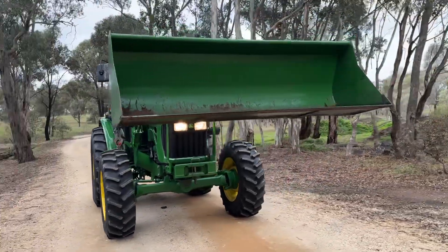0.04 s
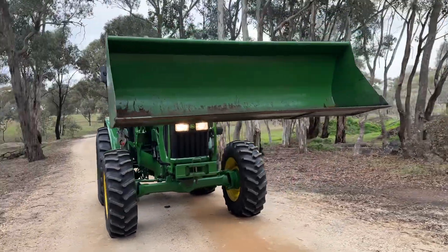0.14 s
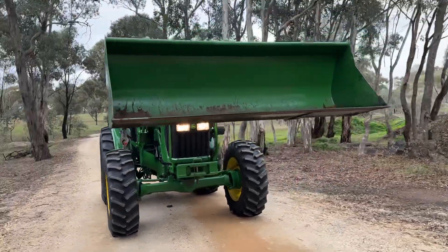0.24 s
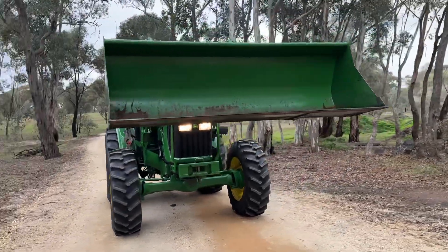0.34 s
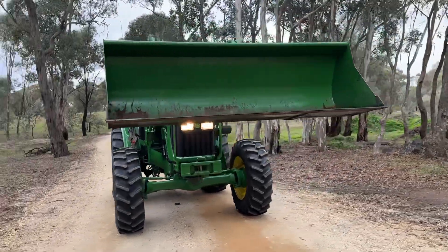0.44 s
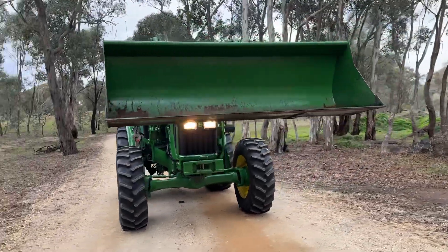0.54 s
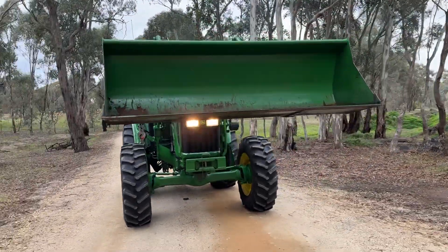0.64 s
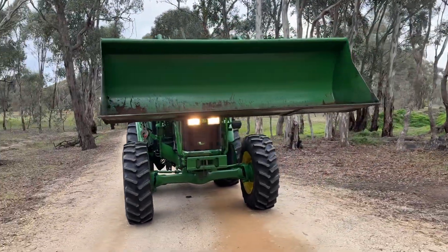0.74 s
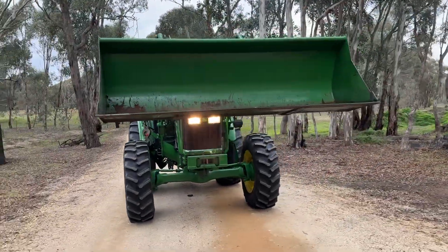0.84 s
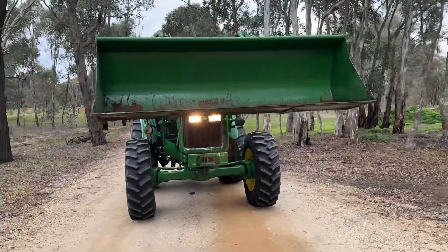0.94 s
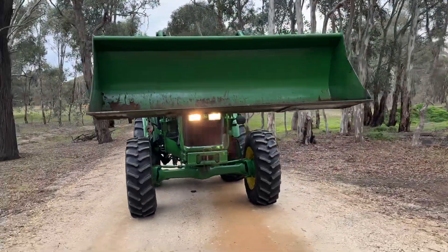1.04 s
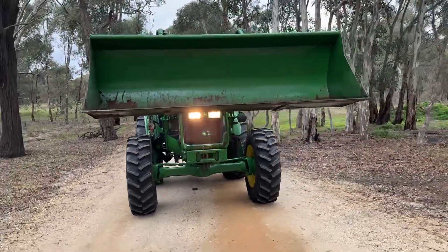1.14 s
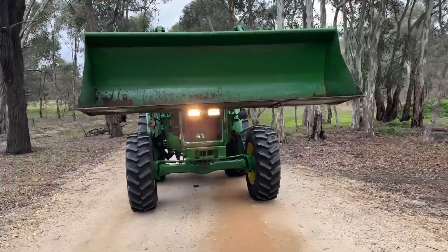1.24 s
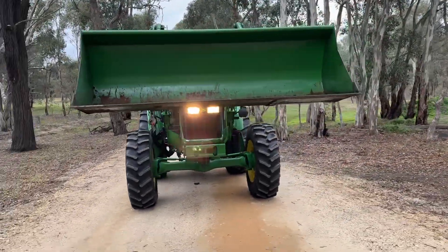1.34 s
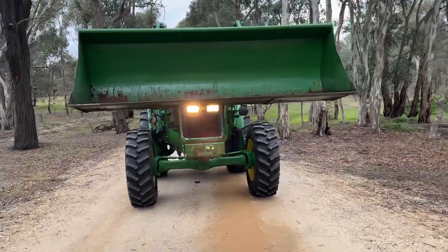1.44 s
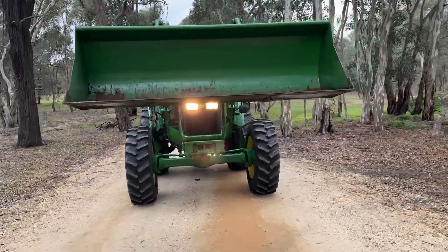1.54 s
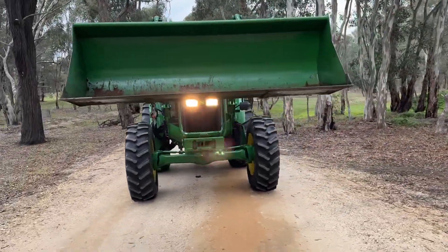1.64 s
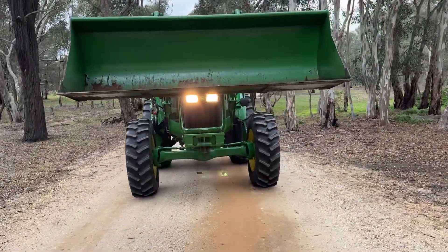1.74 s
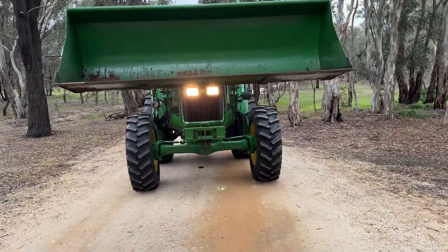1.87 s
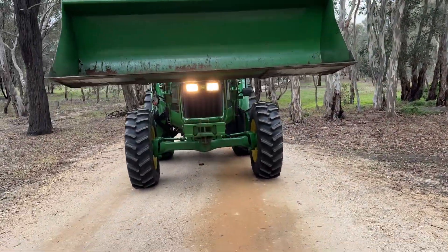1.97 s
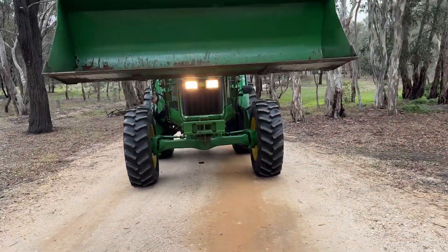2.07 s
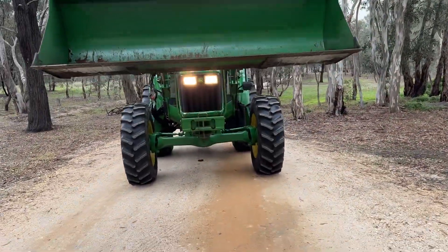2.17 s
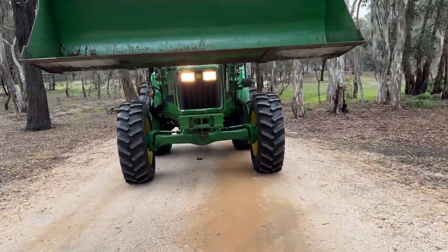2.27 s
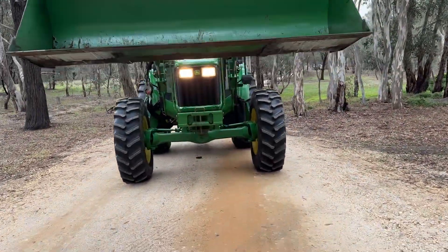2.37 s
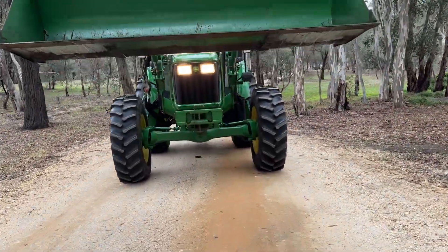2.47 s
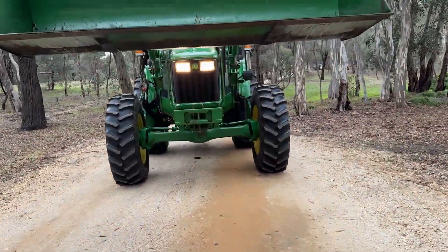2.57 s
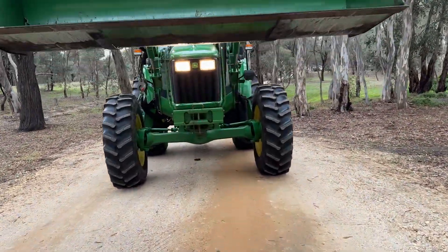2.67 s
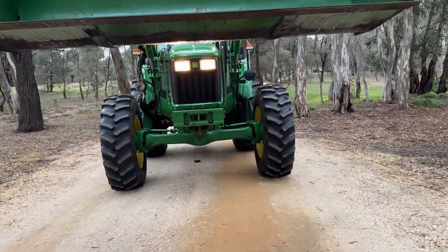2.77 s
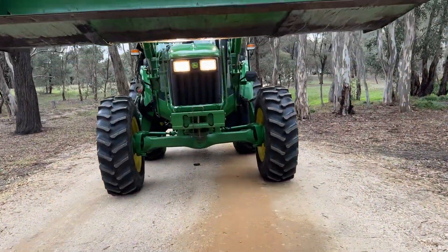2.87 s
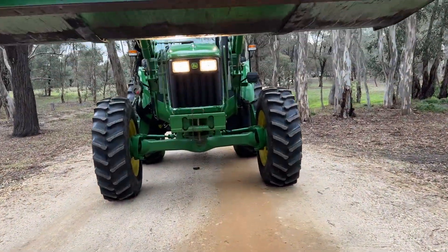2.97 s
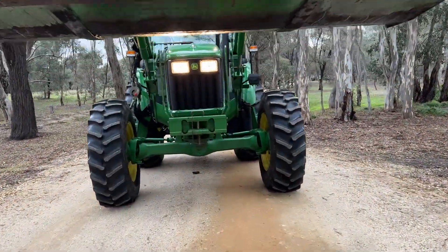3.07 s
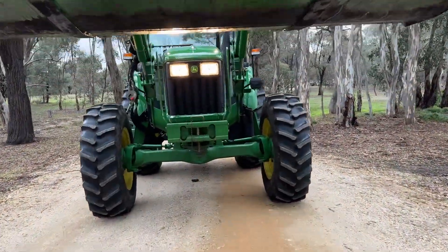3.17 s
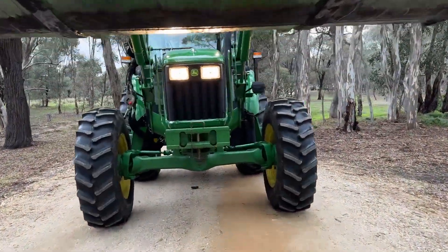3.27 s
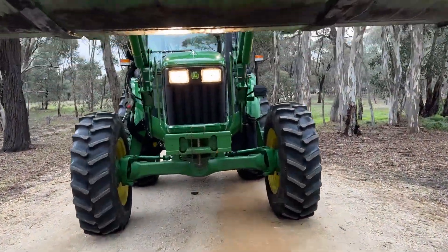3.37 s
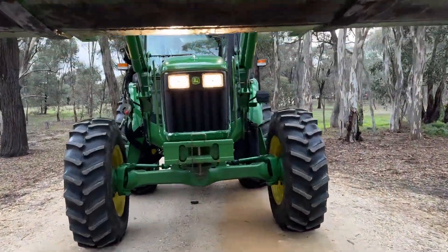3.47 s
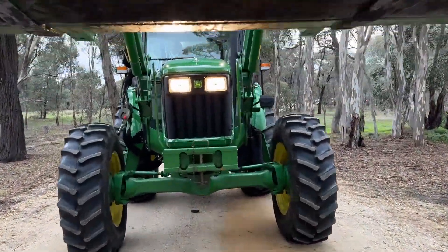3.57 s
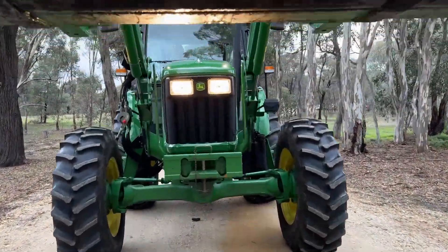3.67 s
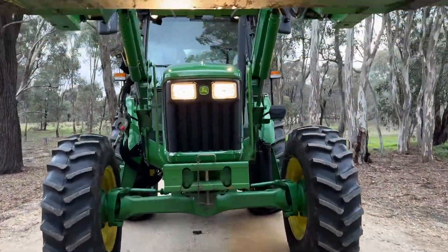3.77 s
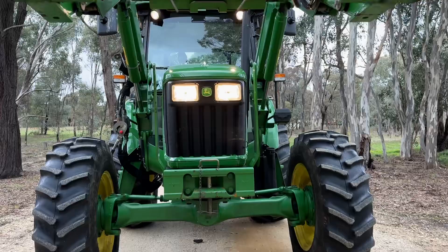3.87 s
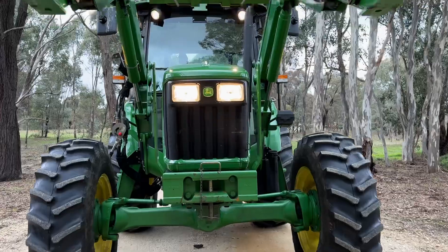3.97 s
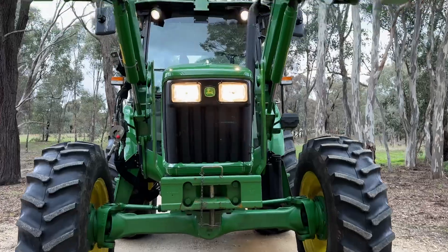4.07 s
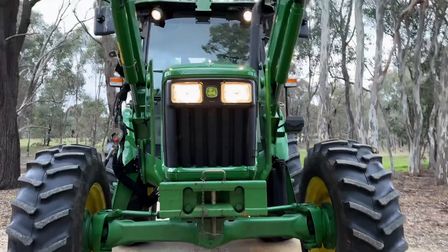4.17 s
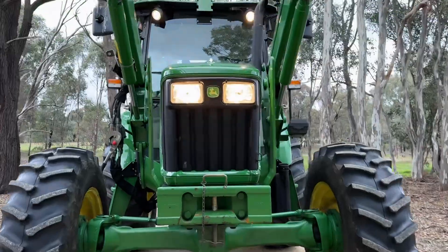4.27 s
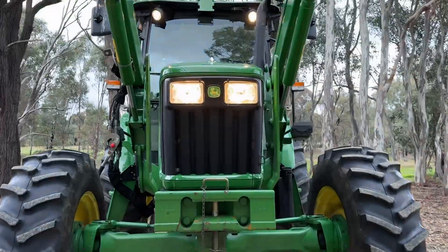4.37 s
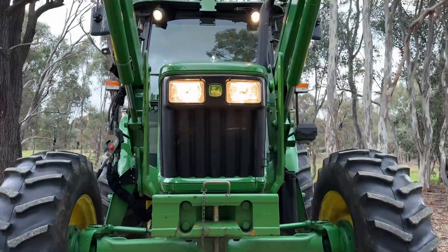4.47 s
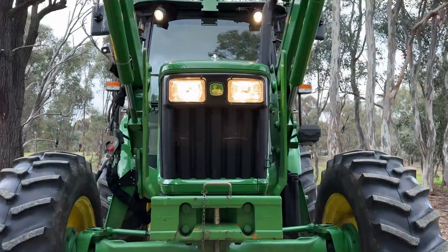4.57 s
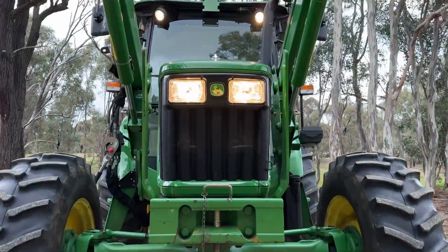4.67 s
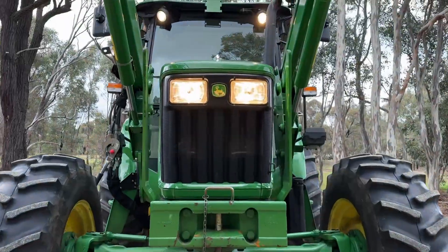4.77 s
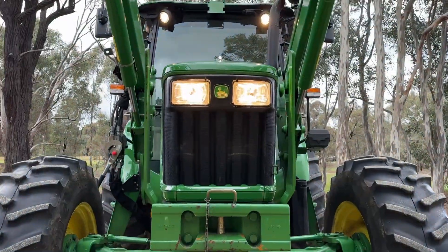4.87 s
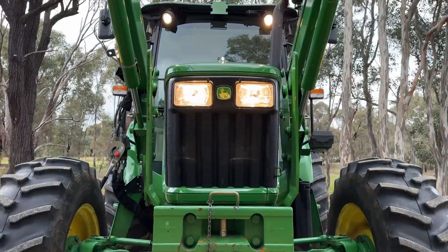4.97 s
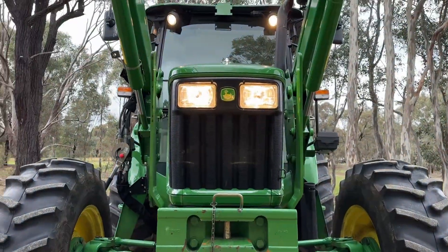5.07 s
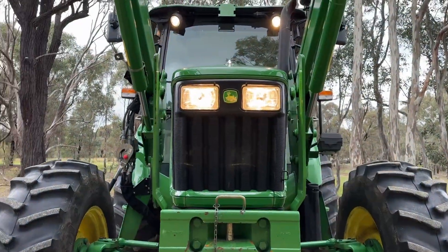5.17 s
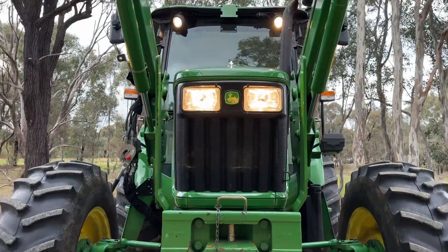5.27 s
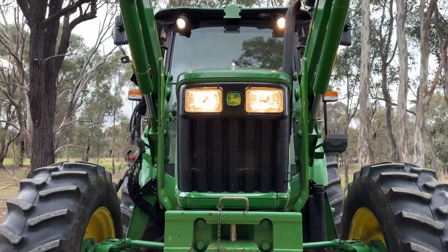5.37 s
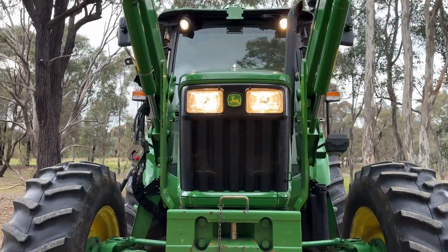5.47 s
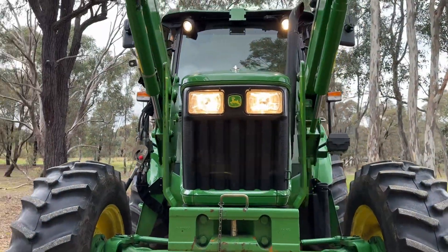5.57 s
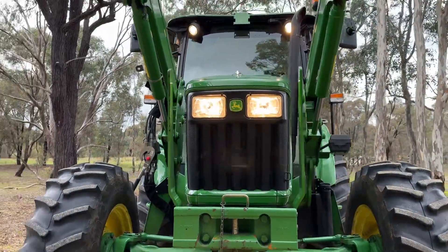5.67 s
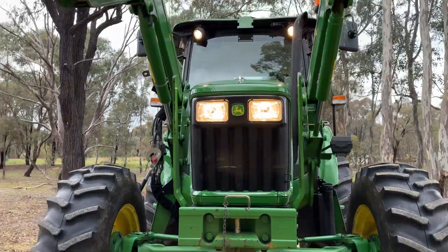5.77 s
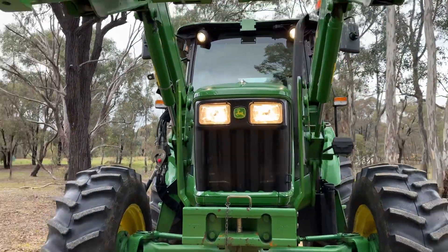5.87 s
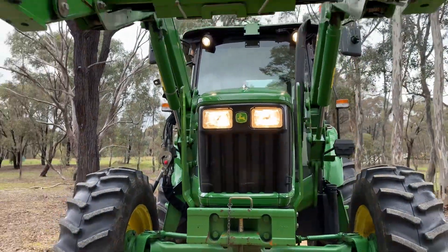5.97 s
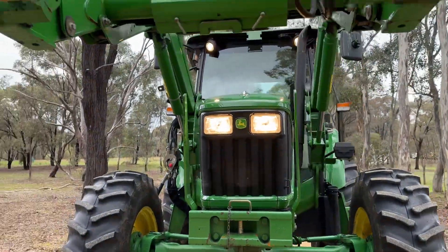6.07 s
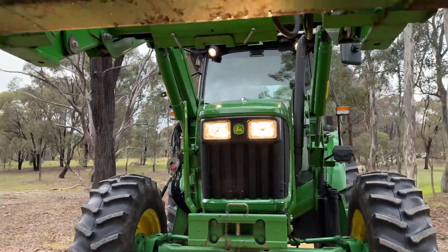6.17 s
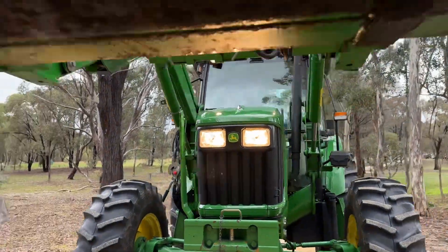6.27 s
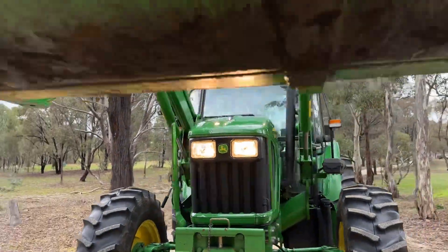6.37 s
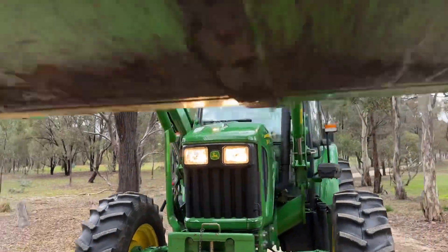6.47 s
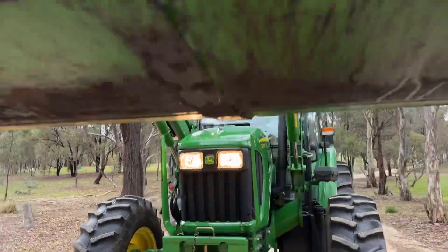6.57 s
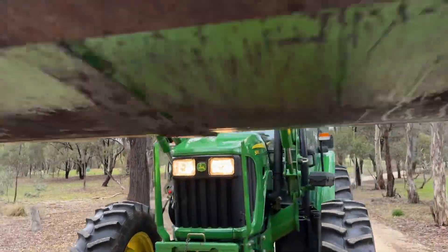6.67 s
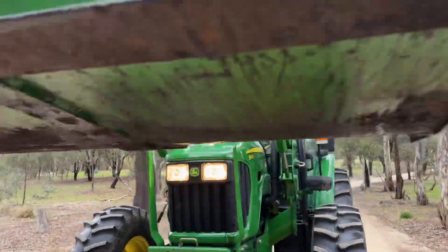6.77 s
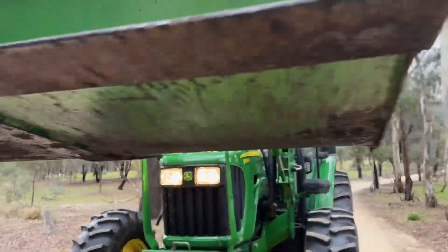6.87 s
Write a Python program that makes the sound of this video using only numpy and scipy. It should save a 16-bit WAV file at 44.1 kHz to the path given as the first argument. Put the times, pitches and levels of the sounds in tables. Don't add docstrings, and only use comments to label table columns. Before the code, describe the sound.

A four-cylinder diesel tractor idles at a constant speed outdoors. Low exhaust throb and dull knocking come first from about five metres, then swell as the handheld microphone walks under the raised steel bucket to the grille. Close up, metallic ticking and airy fan hiss stand out; backing away softens the engine, with clatter bouncing off the bucket. Light low wind buffets the stereo microphone.

```python
import sys
import numpy as np
from scipy import signal
from scipy.fft import rfft, irfft, next_fast_len
from scipy.io import wavfile
from scipy.ndimage import uniform_filter1d, map_coordinates

SR = 44100
rng = np.random.default_rng(int(sys.argv[2]) if len(sys.argv) > 2 else 0)


def level_to_linear(level):
    exponent = np.asarray(level, float) / 20
    return 10 ** exponent


def store_wav(level_fs):
    pcm = np.round(np.clip(np.atleast_2d(level_fs), -1, 1) * 32767)
    wavfile.write(sys.argv[1], SR, pcm.T.astype(np.int16))


N = 305613
FIRING_HZ = 26.309


def exhaust():
    # order [times firing rate], clear_db, under_bucket_db, grille_db
    orders = [(1, -55.5, -48, -48.5), (4, -33.5, -28, -28.5), (5, -47, -57, -48), (6, -32, -39, -31),
              (7, -30, -28, -43), (7.5, -43, -32, -42), (8, -41, -31, -26), (9, -38, -34, -32.5),
              (10, -48, -29, -30), (11, -47.5, -38.5, -36.5), (12, -65, -45.5, -42), (13, -43, -39, -52),
              (15, -47.5, -49, -37.5), (17.5, -48, -37.5, -47)]
    # centre_s, pitch_hz, lift_db, half_length_s
    bucket = [
        (3.2, 199, 2.5, .5),
        (4.0, 235, 2, .3),
        (5.0, 238, 2.5, .4),
        (6.2, 272, 5.5, 0.38),
        (6.303, 184, -4, .4),
    ]
    # centre_s, lift_db, half_length_s
    swells = [
        (4.25, 6.5, .5),
        (5.897, 4.5, .55),
    ]
    place = standing()
    pulse = 2 * np.pi * (firings() + .38)
    hollows = [(hz, db * swell(s, half)) for s, hz, db, half in bucket]
    front = np.clip((place - .2) / .6, 0, 1) * np.pi / 2

    def tone(k):
        return np.sqrt(2) * np.cos(k * pulse - 2 * np.pi * (.05 - .04 * place))

    def intake(k):
        return np.sqrt(2) * np.cos(k * (pulse - 2 * np.pi * .58) - 2 * np.pi * .3)

    def heard(k):
        if k < 5:
            return tone(k)
        return np.cos(front) * tone(k) + np.sin(front) * intake(k)

    def lift(k):
        return sum(db / (1 + ((k * FIRING_HZ - hz) / 35) ** 2) for hz, db in hollows)

    second_db = falloff(-24, 6.5) + 0.18 * wobble(5.3)
    third_db = falloff(-18.5, 3) + sum(db * swell(s, half) for s, db, half in swells)
    third_db = third_db + 0.23 * wobble(6.1)
    resonant = np.sqrt(2) * np.cos(3 * (pulse - 2 * np.pi * .38))
    boom = level_to_linear(second_db) * tone(2) + level_to_linear(third_db) * resonant
    upper = 0
    for k, *place_db in orders:
        level_db = np.interp(place, range(3), place_db) + lift(k) + .7 * wobble(2.48)
        upper = upper + level_to_linear(level_db) * heard(k)
    uneven = 1 + 0.15 * np.cos(pulse / 4 + 1.5) + 0.096 * np.cos(pulse / 2 + 1.66)
    return (boom + uneven * upper) * level_to_linear([[.85], [-.85]])


def block():
    # pitch_hz, level_db (per Hz)
    far_block = [(180, -31), (300, -3.5), (311, -21), (339, -3.5), (418, -7.5), (449, -5.5), (707, -7),
                 (761, -7.5), (1110, -12), (1240, -10), (1470, -16), (1610, -16.5), (2590, -25.5),
                 (3040, -31), (5600, -34), (7280, -57), (12300, -120)]
    # pitch_hz, level_db (per Hz)
    near_block = [(180, -23), (300, 3.5), (315, -1.5), (439, -2), (508, -5.5), (618, -5), (829, -4),
                  (1090, -9), (1210, -7), (1570, -14), (1790, -14), (1950, -18.5), (2500, -20),
                  (3690, -28.5), (5600, -29.5), (7280, -46), (12300, -120)]
    # pitch_hz, level_db (per Hz)
    panels = [(90, -68), (120, 3), (150, -7.5), (195, 2), (240, -5), (300, -12), (420, -59.5)]
    # pitch_hz, level_db (against the steady roar)
    flare = [(300, -5.5), (700, -4), (1200, 3), (2500, 4.5), (5600, 5)]
    near = np.clip(standing() / 1.66, 0, 1) * np.pi / 2
    blow = unit(bursts(.68, 0.25, 0.32, steady=.05, scatter_db=1.42))
    roar = rng.standard_normal((2, N)) * level_to_linear(0.43 * wobble(9))
    face = ports([np.cos(near) * roar, np.cos(near) * blow, np.sin(near) * roar, np.sin(near) * blow],
                 [colour(far_block), colour(far_block, flare), colour(near_block), colour(near_block, flare)])
    face = face / np.sqrt(uniform_filter1d(np.mean(face ** 2, 0), size=SR // 2))
    drum = ports([rng.standard_normal((2, N))], [colour(panels)])
    return level_to_linear(knock_level() - .5) * face + level_to_linear(knock_level() - 4) * drum


def rings():
    # pitch_hz, width_hz, far_db, near_db, favoured_cylinder (rounded to 0-3; -1 favours none),
    # other_cylinders_db
    parts = [(351, 20, -4.5, -6, 0, -1.5), (437, 19.6, -4, 0, 3, -2), (635, 30, -6.5, 1, -0.5, -3.5),
             (981, 42, -2.5, -6, 3, -3.5), (1147, 48, -3.5, -1, 2, -6), (1471, 34, -1.5, -8, 2.5, -1.5),
             (1756, 50, -9, -5.5, -0.5, -6.5), (2549, 70, -13.5, -9, 1, -9.5),
             (6470, 90, -22.5, -11.5, -1, -0.5)]
    near = standing() / 2
    count = firings()
    which = np.arange(-1, int(count[-1]))[:, None]
    draws = rng.standard_normal((len(which), 3, 2 + len(parts)))
    when = which + [.8, .93, 1.12] + .02 * draws[..., 0]
    at = np.clip(np.searchsorted(count, when), 0, N - 1).ravel()
    side = np.sign(draws[..., 1])
    out = np.zeros((2, N))
    for k, (hz, width, far_db, near_db, cylinder, others_db) in enumerate(parts):
        rap_db = np.array([0, -1.5, -4]) + others_db * (which % 4 != round(cylinder)) + 1.8 * draws[..., 2 + k]
        size = level_to_linear(rap_db) * (when > count[0])
        raps = [np.bincount(at, size.ravel(), N), np.bincount(at, (size * side).ravel(), N)]
        ringing = signal.lfilter(*signal.iirpeak(hz, hz / width, SR), raps)
        out += (-1) ** k * level_to_linear(far_db + near * (near_db - far_db)) * ringing
    return level_to_linear(knock_level() - 6.0) * ports([out], [np.ones_like])


def injectors():
    # pitch_hz, level_db (per Hz)
    tick = [(2500, -45), (4000, 3.5), (6000, -14.5), (8800, -11), (10500, 10.5), (12500, 3.5),
            (15500, -0.5)]
    ticks = bursts(.55, 0.23, .25, steady=0.15, scatter_db=2.2)
    return level_to_linear(falloff(-48.5, 6.5, echo_db=3.5) + 8.5) * ports([ticks], [colour(tick)])


def fan():
    # pitch_hz, level_db (per Hz)
    hiss = [(5300, -58), (5900, -13.5), (6500, -2), (7200, -0.5), (7800, 3.5), (8400, -2.5), (9200, -10),
            (11000, -42.5), (13000, -69)]
    air = bursts(0.8, 0.092, 0.25, steady=0.87, scatter_db=3.5)
    return level_to_linear(falloff(-37.5, 6.5, echo_db=0.5) + 6 + wobble(14)) * ports([air], [colour(hiss)])


def wind():
    # pitch_hz, level_db (per Hz)
    buffet = [(25, -69), (45, -4), (70, 2), (100, -2), (140, -14), (200, -54)]
    # peak_s, peak_db, half_length_s
    gusts = [
        (2.13, -31, .14),
        (2.6, -36, .3),
        (3.15, -33, .35),
        (6.75, -30, .15),
    ]
    strength = level_to_linear(falloff(-39, 4)) + sum(level_to_linear(db) * swell(s, half) for s, db, half in gusts)
    return strength * level_to_linear(1.5 * wobble(12)) * ports([rng.standard_normal((2, N))], [colour(buffet)])


def firings():
    sound_m_per_s, first_firing = 343, .468
    return FIRING_HZ * (np.arange(N) / SR - distance() / sound_m_per_s) + first_firing


def bursts(start, rise, fall, steady, scatter_db):
    cylinders = [0.6, 0.35, -0.24, -.6]
    since = firings() - start + 4
    which, u = since.astype(int), since % 1
    scatter = scatter_db * rng.standard_normal(which[-1] + 1)[which]
    size = level_to_linear(np.take(cylinders, which % len(cylinders)) + scatter)
    flare = (1 - np.exp(-u / rise)) * np.exp(-u / fall) * size
    return (steady + flare) * rng.standard_normal((2, N))


def distance():
    # time_s, distance_m
    walk = [
        (0, 4.76),
        (.5, 5.02),
        (2, 4.9),
        (2.8, 3.61),
        (3.6, 2.65),
        (4.8, 1.83),
        (5.2, 1.8),
        (5.6, 1.96),
        (6.4, 2.62),
        (6.93, 2.82),
    ]
    time_s, metres = np.transpose(walk)
    return np.interp(np.arange(N) / SR, time_s, metres)


def standing():
    grille_m, under_bucket_m, clear_m = 1.75, 2.5, 3.9
    return np.interp(distance(), [grille_m, under_bucket_m, clear_m], [2, 1, 0])


def falloff(near_db, loss_db, echo_db=0):
    echo_from_s, echo_rise_s = 6.0, .4
    under = np.clip((np.arange(N) / SR - echo_from_s) / echo_rise_s, 0, 1)
    return near_db - loss_db * np.log2(distance() / 2) + echo_db * under


def knock_level():
    return falloff(-25, 5.5, echo_db=2)


def ports(pair, response):
    # pitch_hz, likeness (clipped to 0-1)
    alike = [(100, .85), (400, 0.97), (700, 0.9), (1100, 0.92), (1700, 0.65), (3300, 0.38), (5500, 0.5),
             (6800, .5), (7800, 0.91), (9000, 0.86), (10500, 0.9), (12500, 0.5), (14000, 0.2), (15500, 3)]
    # pitch_hz, lead_rad
    ahead = [(0, 0), (1290, .15), (2000, 1.3), (2700, 1.2), (4570, .15), (6120, .5), (7000, 2.1),
             (7800, 3.05), (10900, 3.0), (12300, 1.9), (14000, .3), (15700, 0)]
    # pitch_hz, level_db
    lean = [(60, 4.5), (200, 3.5), (450, 0), (800, 1), (1290, -2.5), (2200, -1), (3500, 6), (7000, 4.5),
            (8500, 4), (9500, 2), (15000, -1.5)]
    m = next_fast_len(N + 8192)
    hz = np.fft.rfftfreq(m, 1 / SR)
    turn = np.arccos(np.clip(along(alike, hz), 0, 1)) / 2
    spectra = sum(rfft(p, m) * r(hz) for p, r in zip(pair, response))
    shared, apart = spectra * [np.cos(turn), np.sin(turn)]
    skew = level_to_linear(along(lean, hz) / 2) * np.exp(.5j * along(ahead, hz))
    return unit(irfft([(shared + apart) * skew, (shared - apart) / skew], m)[:, :N])


def colour(*spectra):
    return lambda hz: level_to_linear(sum(along(s, hz) for s in spectra))


def along(points, hz):
    f, v = np.transpose(points)
    return np.interp(np.log(hz + 1), np.log(f + 1), v)


def unit(x):
    return x / np.sqrt(np.mean(x ** 2) + 1e-20)


def swell(s, half):
    return np.exp(-((np.arange(N) / SR - s) / half) ** 2)


def wobble(rate):
    at = np.arange(0, N + 64, 64)
    knots = rng.standard_normal(int(N * rate / SR) + 4)
    return np.interp(np.arange(N), at, map_coordinates(knots, [at * rate / SR], order=3))


def scene():
    return exhaust() + block() + rings() + injectors() + fan() + wind()


def top_cut(x):
    return signal.sosfilt(signal.butter(12, 16140, fs=SR, output="sos"), x)


def record(dry):
    return top_cut(dry)


dry = scene()
out = record(dry)
store_wav(out)
```